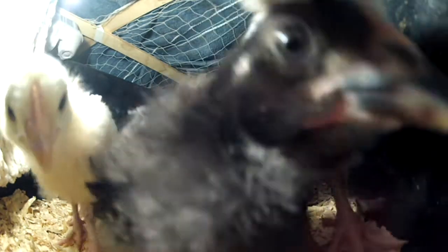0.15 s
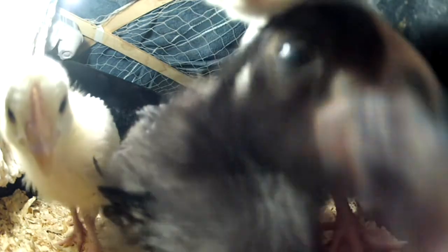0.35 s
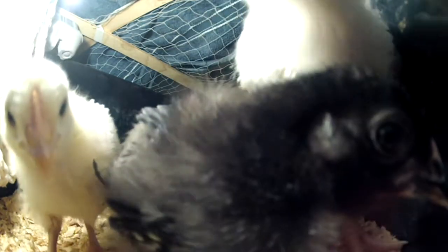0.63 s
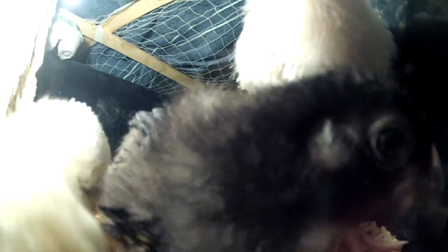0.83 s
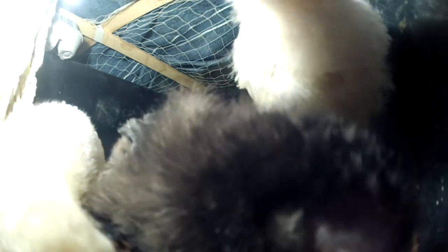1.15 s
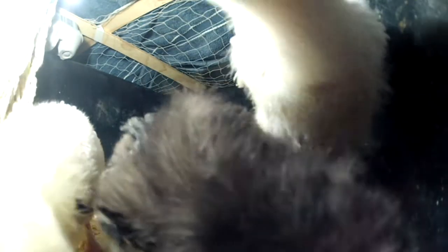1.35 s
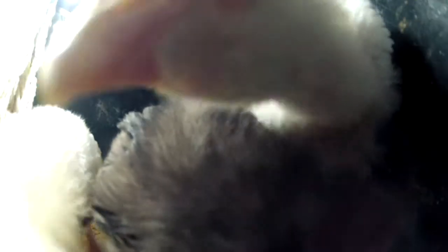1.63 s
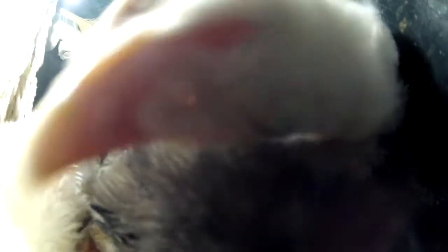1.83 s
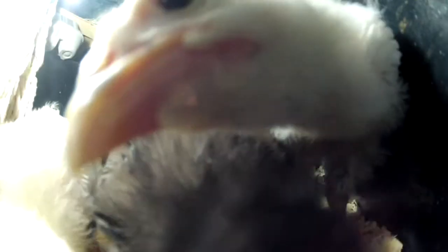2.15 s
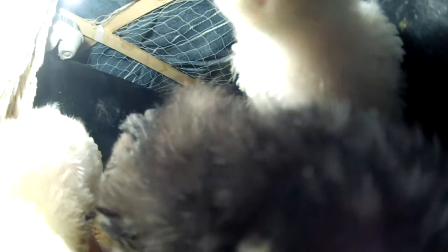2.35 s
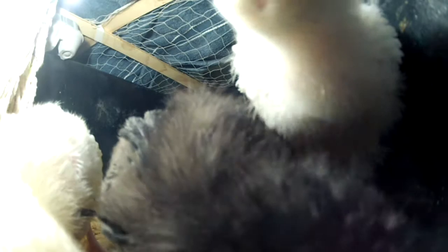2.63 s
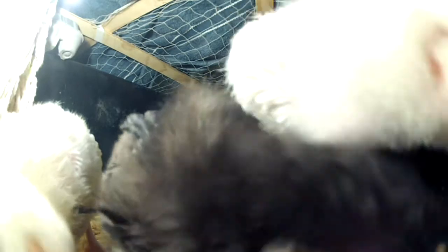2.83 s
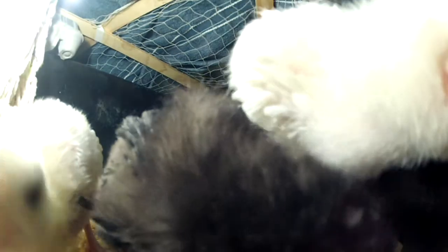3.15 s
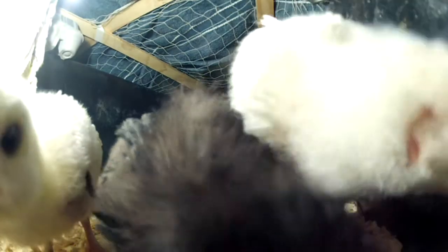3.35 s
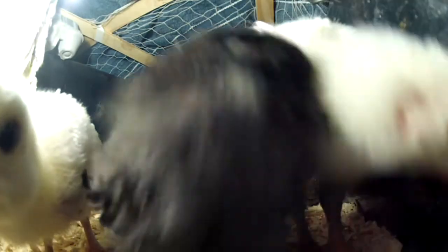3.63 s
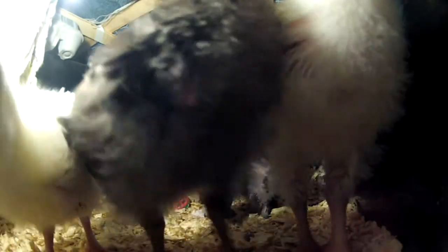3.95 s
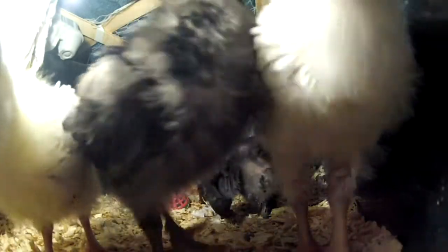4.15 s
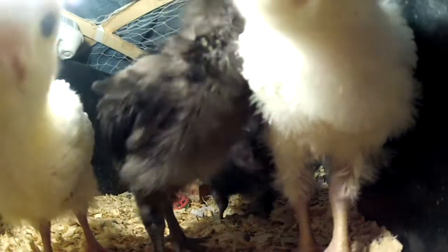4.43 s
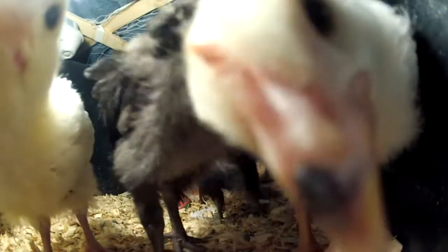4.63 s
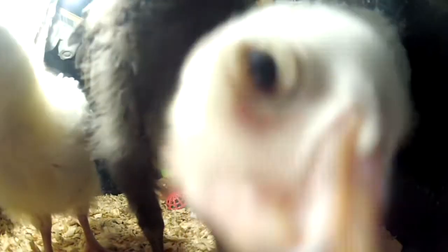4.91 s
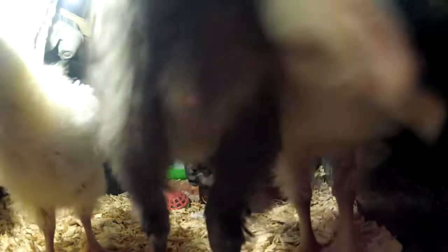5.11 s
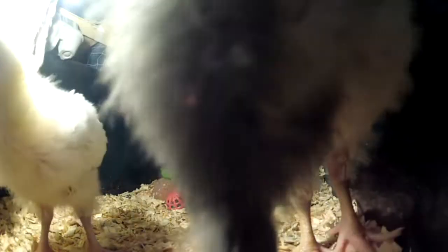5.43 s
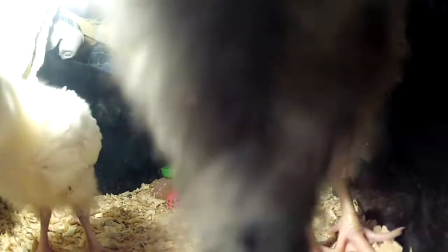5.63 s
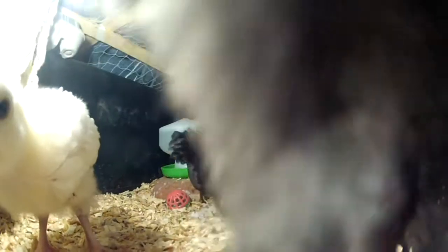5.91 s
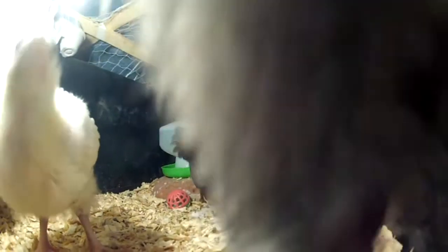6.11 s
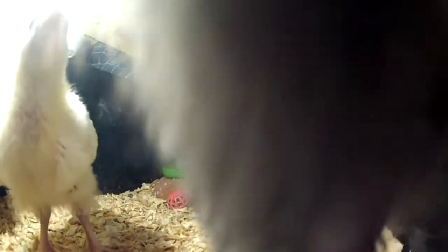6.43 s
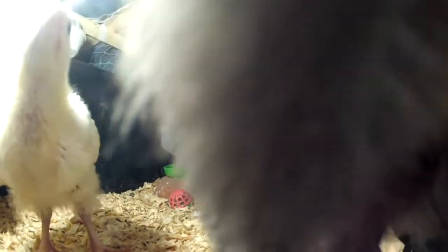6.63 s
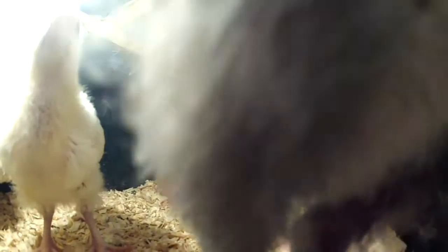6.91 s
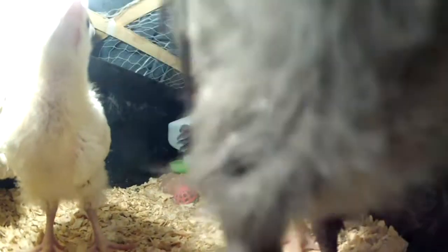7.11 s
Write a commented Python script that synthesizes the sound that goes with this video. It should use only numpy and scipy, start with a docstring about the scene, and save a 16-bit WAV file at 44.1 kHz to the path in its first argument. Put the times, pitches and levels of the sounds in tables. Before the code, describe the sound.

A microphone inside a small plastic housing sits among chicks on wood shavings. A rising peep is already sounding at 0 s, then short falling, slightly hoarse peeps follow until 0.5, over low, lumpy trampling. A sharp knock with a jolt lands at 0.57. More peeps come at 1.2, 1.3 and 1.6; hard pecks strike at 1.5, and a scraping cluster at 1.87-2.0 ends with a bump. Further knocks fall at 2.3, 2.9 and 3.5. From 3.6 to 5 it is mostly quiet hiss, soft rumble and small bumps, with faint peeps at 4.4 and from 4.8, growing clearer until 5.5. Strong pecks hit at 5.09, 5.37 and 5.53, with a long scrape at 5.85. From 5.9 to 7.25, down rubs in rough swells among knocks, notably near 6.13, 6.42, 6.76 and 7.13. Dry, close, gritty, clipping on peaks.

```python
"""Chicks around a plastic housing

Chicks crowd a small camera in its plastic housing on wood shavings. Peeps are gliding sines with a near echo;
rumble through the litter is shaped noise. Down, feet, beaks and claws rub the shell: tiny slips excite its modes.
Soft bumps rock the housing; sharp knocks make it ring briefly and jolt. A steady hiss lies underneath.
The recorder samples at 12 kHz and holds each value, so every sound is mirrored around 6 and 12 kHz."""
import sys
import numpy as np
from scipy import signal
from scipy.fft import rfft, irfft, next_fast_len
from scipy.io import wavfile
from scipy.ndimage import uniform_filter1d

SR = 44100
rng = np.random.default_rng(int(sys.argv[2]) if len(sys.argv) > 2 else 0)


def wav_record(signal):
    """Record a signal, one row per channel, as 16-bit PCM in the file named by sys.argv[1]."""
    frames = np.transpose(np.atleast_2d(signal))
    bounded = np.clip(frames, -1, 1)
    # unit amplitude maps onto the largest positive 16-bit level
    quanta = np.round(bounded * 32767).astype(np.int16)
    wavfile.write(sys.argv[1], SR, quanta)


N = 320607  # length in samples


def from_db(db):
    """Turn dB into gain."""
    return 10 ** (np.asarray(db) / 20)


def rms_one(x):
    """Scale to rms 1."""
    return x / np.sqrt(np.mean(x ** 2) + 1e-20)


def peak_at(rows, db):
    """Scale each row to its peak level."""
    return rows / np.abs(rows).max(axis=1, keepdims=True) * from_db(db)[:, None]


def drift(rate_hz):
    """Slow random wander of rms 1: noise through a double one-pole low-pass."""
    pole = np.exp(-2 * np.pi * rate_hz / SR)
    noise = rng.standard_normal(N + SR)
    slow = signal.lfilter([1], [1, -2 * pole, pole * pole], noise)
    return rms_one(slow[SR:])  # the first second lets the filter settle


def coloured(spectrum):
    """Noise of rms 1 whose spectrum is drawn in dB over log frequency."""
    size = next_fast_len(N)
    hz, db = np.transpose(spectrum)
    grid_hz = np.arange(1, size // 2 + 2) * SR / size
    gain = from_db(np.interp(np.log(grid_hz), np.log(hz), db))
    return rms_one(irfft(rfft(rng.standard_normal(size)) * gain, size)[:N])


def laid_out(seconds, rows):
    """Add each row into the timeline at its time."""
    out = np.zeros(N + rows.shape[1])
    starts = np.round(seconds * SR).astype(int)
    for start, row in zip(starts, rows):
        out[start:start + len(row)] += row
    return out[:N]


# housing modes, from rocking on the litter up to the high shell modes:
# (frequency [Hz], strength [dB], decay t60 [s])
HOUSING = [(60, -4.5, .05), (132, 2.5, 0.015), (310, -7.5, 0.014), (394, -5.5, 0.021), (695, -1.5, 0.016),
           (1058, -1, 0.013), (1371, 0, 0.0081), (1828.5, 0, 0.016), (2272, -1.5, 0.011),
           (2693, -7.5, .012), (3115, -2, 0.011), (3674, 1, 0.015), (4350, -8.5, 0.0055),
           (4900, -5.5, 0.0095), (5660, -0.5, .005)]
JOLT_MODES = HOUSING[:3]
SHELL = HOUSING[3:7], HOUSING[7:8], HOUSING[8:10], HOUSING[10:]  # low, ring, upper and high families
SHELL_SIGNS = 1, 1, -1, -1  # keep neighbouring modes in opposition across the families


def ring(forces, modes, spread_db):
    """Each row of force drives every mode as a decaying sine, with mode strengths of its own."""
    out = 0
    chance = rng.standard_normal((len(forces), len(modes)))
    for k, (hz, db, t60) in enumerate(modes):
        decay = from_db(-60 / (t60 * SR))
        w = 2 * np.pi * hz / SR
        sign = (-1) ** (k + 1)  # neighbouring modes swing in opposition
        gain = sign * from_db(db + spread_db * chance[:, k:k + 1])
        resonator = [1, -2 * decay * np.cos(w), decay * decay]
        out = out + gain * signal.lfilter([0, np.sin(w)], resonator, forces + 1e-18)
    return out


# gliding calls of the chicks: (time [s], length [ms], first pitch [Hz], last pitch [Hz], bend of the glide [exponent],
# crest level [dB], opening level re crest [dB], hoarseness [0 = clear])
PEEPS = [(0, 39.5, 2350, 3600, 4, -39.5, -14, 0), (.181, 50.4, 2740, 2220, 1.4, -44.5, -3.5, 0.19),
         (0.311, 48, 3110, 2195, 1.48, -40.5, -11, 0.6), (.492, 46.7, 3100, 2280, 1.23, -40, -17, 1),
         (1.207, 46, 2940, 2195, 1.2, -37.5, -16.5, 0.51),
         (1.332, 51.4, 2970, 2220, 1.03, -38, -18.5, 0.95),
         (1.629, 62.4, 3120, 2330, 1.06, -36.5, -10.5, 0.78), (4.436, 42, 3750, 2473, 1.35, -56.5, -10, .1),
         (4.78, 48.5, 2880, 2230, 1.64, -55, 3.5, 0.2), (4.895, 48, 2950, 2240, 1.9, -51, 0, 0.029),
         (5.044, 52.5, 2900, 2230, 1.1, -47, -3, 0.21), (5.265, 55, 3365, 2760, 0.88, -48.5, -3, 0.4),
         (5.385, 36, 2970, 2640, 1.12, -43, -8, 0), (5.503, 43.2, 3300, 2700, 2.2, -40, -3, 0.17)]
OCTAVE_DB = -23.5  # second harmonic re fundamental
RASP_HZ, RASP_S = 465, 0.014  # top of the flutter band; how long the flutter lasts
PEEP_ATTACK_S, PEEP_RELEASE_S, PEEP_EDGE_DB = 0.0078, 0.011, -21
PEEP_CREST_S, PEEP_SAG_DB = .022, -4  # the crest comes this long before the end, then the level sags
WALL_ECHO_S, WALL_ECHO_DB = .0028, -3.5  # a near wall's echo notches the glide every few hundred Hz


def peeps():
    """Whistles with a weak octave glide along a bent pitch curve; hoarse ones open with a flutter in level."""
    flutter_band = signal.butter(4, RASP_HZ, fs=SR, output="sos")
    hoarse = rms_one(signal.sosfilt(flutter_band, rng.standard_normal(N)))
    out = np.zeros(N)
    for s, length_ms, first_hz, last_hz, bend, db, opening_db, rasp in PEEPS:
        length = length_ms / 1e3
        at = np.arange(int(s * SR), int((s + length) * SR))
        t = np.maximum(at / SR - s, 0)

        # height runs from 0 at the low pitch to 1 at the high pitch
        height = t / length if last_hz > first_hz else np.maximum(1 - t / length, 0)
        pitch_hz = min(first_hz, last_hz) + abs(first_hz - last_hz) * height ** bend
        phase = 2 * np.pi * np.cumsum(pitch_hz) / SR
        tone = np.sin(phase)
        octave = from_db(OCTAVE_DB) * np.sin(2 * phase)

        start_db = opening_db + PEEP_EDGE_DB * (s > 0)  # a peep at time 0 is already sounding
        turns = [0, PEEP_ATTACK_S, length - PEEP_CREST_S, length - PEEP_RELEASE_S, length]
        shape_db = np.interp(t, turns, [start_db, opening_db, 0, PEEP_SAG_DB, PEEP_EDGE_DB])
        flutter = 1 + rasp * np.exp(-(t / RASP_S) ** 4) * hoarse[at]
        out[at] += np.sqrt(2) * from_db(db + shape_db) * (flutter * tone + octave)
    samples = np.arange(N)
    echo = np.interp(samples - WALL_ECHO_S * SR, samples, out)
    return out + from_db(WALL_ECHO_DB) * echo


# trampling in the litter, level before the lumps: (time [s], level [dB])
TRAMPLING = [(0.0, -56), (0.12, -51), (0.28, -45), (0.47, -46.5), (0.89, -54), (1.07, -56), (2.27, -52.5),
             (2.59, -60), (3.36, -58), (3.62, -52.5), (4.96, -53.5), (5.28, -49), (5.43, -48),
             (5.55, -44.5), (5.93, -42), (6.5, -52), (6.66, -45), (6.82, -78), (7.07, -45), (7.27, -38)]
# colour of the bass carried by the litter: (frequency [Hz], level [dB per Hz])
RUMBLE = [(12, -27.5), (20, -1.5), (65, 0), (123, 0.5), (166, -6.5), (248, -21.5), (357, -22.5),
          (500, -30.5), (650, -70.5), (1100, -120)]
SETTLE_DB, SETTLE_S = -27.5, .04  # settling rumble re jolt; its time constant


def rumble(t):
    """Lumpy bass of feet and bodies through the litter, swelling as the housing settles after each jolt."""
    knock_s, jolt_db = np.transpose(KNOCKS)[[0, 2]]
    settling = from_db(jolt_db + SETTLE_DB)[:, None] * np.exp(-t[:SR // 3] / SETTLE_S)
    trampling = from_db(np.interp(t, *np.transpose(TRAMPLING)))
    lumps = from_db(3.2 * drift(13))
    return (trampling + laid_out(knock_s, settling)) * lumps * coloured(RUMBLE)


# steady noise floor: (frequency [Hz], level [dB per Hz])
HISS = [(120, -29), (200, -3.5), (1030, -21), (1550, -21), (1820, -21), (2900, -25.5), (3700, -26),
        (4990, -24.5), (6000, -31.5), (7800, -66.5), (13200, -120)]
HISS_DB = -65  # rms


def hiss():
    """A steady bed of shaped noise."""
    return from_db(HISS_DB) * coloured(HISS)


# strokes of claw or beak along the shell:
# (time [s], length [ms], level [dB], high modes re that level [dB])
STROKES = [(0.066, 110, -62.5, -11), (.165, 52.2, -61, -16), (0.229, 108, -61, -8), (.563, 38.5, -45, -12),
           (1.481, 27, -45, -27), (1.544, 39.5, -45.5, -3), (1.721, 120, -73, -10), (1.872, 54, -33, -4.5),
           (1.959, 23.8, -23.5, -11.5), (1.984, 18.5, -45, -16.5), (2.299, 12, -37, -23.5),
           (2.316, 24, -49.5, -13), (2.34, 19, -37, -19), (2.359, 27.7, -48, -9.5),
           (2.889, 32.5, -35.5, -19.5), (3.486, 21, -54.5, -8.5), (3.505, 38, -42, -12),
           (3.95, 57.4, -66.5, -9), (4.5, 87, -69, -12), (4.64, 110, -67.5, -15), (5.085, 19.5, -47.5, -10),
           (5.322, 46, -45.5, -17), (5.359, 40, -43.5, -2), (5.536, 16.7, -23.5, -7),
           (5.555, 16, -45, -17.5), (5.597, 24, -57, -18), (5.634, 27, -41, -7), (5.847, 58.7, -20, -8.5),
           (6.324, 16, -34, -23)]
# down pressed against the shell by a chick standing over it: (time [s], level [dB])
LEANING = [(5.13, -77), (5.14, -56), (5.25, -48.5), (5.3, -63), (5.34, -52), (5.53, -59.5), (5.57, -75),
           (5.63, -55), (5.64, -51), (5.74, -49), (5.76, -41.5), (5.91, -35), (5.93, -43.5), (5.96, -34),
           (6.0, -50), (6.02, -64), (6.03, -42), (6.13, -30), (6.15, -40), (6.31, -38.5), (6.35, -50.5),
           (6.41, -46.5), (6.44, -57), (6.5, -63), (6.53, -40), (6.58, -41), (6.6, -48.5), (6.8, -43.5),
           (6.83, -54), (6.98, -54.5), (6.995, -46.5), (7.06, -45), (7.08, -31.5), (7.19, -35), (7.21, -49),
           (7.27, -40)]
RUSTLE_DB = -77  # distant stirring in the shavings
RUB_SHARES_DB = -2.5, -4.5, -6  # low, ring and upper shell modes under a rub
LEANING_HIGH_DB = -10  # high shell modes under leaning and rustle
SHORT_STROKE_MS = 45
SHORT_FADE_DB, LONG_FADE_DB = -8.5, -1.5  # change along a stroke: short ones die away, long ones nearly hold


def rubbing(t):
    """Clumps of tiny slips ring the shell, loud during each stroke, faint between; the colour wanders."""
    sizes = from_db(4.5 * np.minimum(rng.exponential(1, N), 5)) * rng.choice([-1, 1], N)
    happens = rng.random(N) < 2600 / SR  # about 2600 slips a second
    clumps = from_db(3.8 * drift(40))
    slips = sizes * happens * clumps

    families = []
    for modes, sign in zip(SHELL, SHELL_SIGNS):
        ringing = sign * rms_one(ring(slips[None], modes, spread_db=0)[0])
        families.append(ringing * from_db(1.8 * drift(25)))

    leaning = from_db(np.interp(t, *np.transpose(LEANING))) * (t > LEANING[0][0])
    steady = from_db(RUSTLE_DB) + leaning
    gains = steady * from_db([*RUB_SHARES_DB, LEANING_HIGH_DB])[:, None]
    for s, length_ms, db, high_db in STROKES:
        at = np.arange(int(s * SR), int((s + length_ms / 1e3) * SR))
        change_db = LONG_FADE_DB if length_ms > SHORT_STROKE_MS else SHORT_FADE_DB
        fade_db = change_db * np.linspace(-.5, .5, len(at))
        shares_db = np.array([*RUB_SHARES_DB, high_db])[:, None]
        gains[:, at] += from_db(db + shares_db + fade_db)
    smooth_gains = uniform_filter1d(gains, size=120, axis=1)  # softens the stroke edges
    return np.sum(np.array(families) * smooth_gains, axis=0)


# soft bumps of feet and bodies, some of them the housing settling after a knock: (time [s], peak level [dB])
BUMPS = [(0.062, -34.5), (0.256, -35), (0.31, -30), (.519, -21), (0.593, -36.5), (2.001, -19),
         (2.92, -30.5), (3.538, -28), (3.968, -29), (4.019, -35.5), (4.344, -35), (4.944, -34),
         (5.378, -20.5), (6.028, -32), (6.609, -24), (7.083, -30)]
BUMP_MS = 22  # time constant


def bumps():
    """Decaying bursts of low-passed noise shove the housing and rock its lowest modes."""
    s, db = np.transpose(BUMPS)
    ms = np.arange(6000) / SR * 1e3
    shoves = rng.standard_normal((len(s), len(ms))) * np.exp(-ms / BUMP_MS)
    soft = signal.sosfilt(signal.butter(2, 140, fs=SR, output="sos"), shoves)
    return laid_out(s, peak_at(ring(soft, JOLT_MODES, spread_db=2.5), db))


# knocks on the shell: (time [s], ring peak [dB], jolt level [dB], brightness re ring [dB], contact [ms],
# shove length [ms], negative is inward)
KNOCKS = [(.069, -41.5, -49, -3, 2.1, -4), (0.1742, -42, -44, -16, 1.7, -3.5),
          (0.1878, -37, -65, -9, 1.8, -1.5), (0.2516, -35.5, -34, -5, 1.5, -1.5),
          (0.3022, -45, -59, 1, 3.5, -1.5), (0.4699, -56, -58.5, 3, 2, -1.5),
          (0.5676, -12.5, -3.5, 8.5, 1.66, 0.07), (.575, -15.5, -8, 5, 1.8, 0.5),
          (0.59, -28.5, -26, -3.5, 4.9, 2), (1.481, -12.5, -1, -2.5, 3.5, 0.6),
          (1.545, -8, -19.5, -0.5, 2, 0.5), (1.5545, -1, -13, -4.5, 1.4, -1.4),
          (1.779, -54.5, -54.5, 7, 1, -6), (1.8144, -46, -61, 1, 2, 1), (1.853, -50, -62.5, -2, 2.4, -1.5),
          (1.873, -9.5, -16.5, 0, 0.47, 3.7), (1.8859, -9.5, -21.5, 5, 1, -6.5),
          (1.9018, -27, -33, 4, 1.3, 1.5), (1.9121, -19.5, -32, -1.5, 3.5, 1),
          (1.961, -8, -27, 1, 2.5, -1.5), (1.9646, -2, -6.5, -2.5, 1.37, -0.55),
          (1.989, -20.5, -16, -4.5, 1.25, -1.5), (2.1415, -52.5, -78, 0, 1, -1.5),
          (2.2985, -19, -7.5, -0.5, 1.33, 1.5), (2.307, -38, -26, 6.5, 3.6, -1.5),
          (2.3385, -12, -8, -2.5, 2.4, 4), (2.3582, -49.5, -33.5, 5, 2.2, -1.5),
          (2.379, -41.5, -31, 4.5, 1.7, 5), (2.7538, -52.5, -72.5, -4, 1, -1.5),
          (2.8833, -0.5, -3.5, -1, 3.24, 1.5), (2.908, -20, -19, -6.5, 0.55, 2),
          (2.9154, -26.5, -38, -5, 0.94, -1.5), (3.2178, -56.5, -64, 6, 1, -1.5),
          (3.4791, -37.5, -30.5, 0.5, 1.46, -5), (3.5058, 0, -10, -4, 3.9, 3.6),
          (3.5221, -26.5, -25, 2, 0.88, -6.5), (3.559, -44.5, -39, -6, 6.4, 3),
          (3.976, -58, -52, 2.5, 5, -1.5), (4.2932, -57.5, -66, -1.5, 2, -1.5),
          (4.4246, -46, -32, -11, 0.56, -0.55), (4.66, -38, -44, -4, 5.1, -0.5),
          (5.0876, -6, -3.5, 5, 2.87, 2.6), (5.1348, -26.5, -40, -4.5, .6, 0.5),
          (5.1447, -28.5, -41, 0, 2.8, 5), (5.1521, -34, -51, -4, 1.9, -1),
          (5.177, -41.5, -39, -8.5, 4.6, -4), (5.203, -33.5, -46, -5.5, 1.9, -5.5),
          (5.3371, -40.5, -50, 5, 3.5, -1.5), (5.3439, -36, -45, 4, 2.9, 0.5),
          (5.3718, -5, -10, 3, 3.4, -0.2), (5.499, -39, -40, 1, 2.26, 3), (5.534, -2.5, -18, -5, 0.89, -4),
          (5.5405, -27, -29.5, -7.5, 1.5, -1.5), (5.598, -15, -13, -12, 5.95, -0.3),
          (5.6444, -35.5, -42, 5, 3.1, -1.5), (5.707, -42, -59, 4, 1.8, -1.5),
          (5.732, -31.5, -32, 1, 4, -15), (5.7579, -33, -15, 3, 0.47, -3), (5.8489, -9, -30, -15, 3, -3),
          (5.8641, -20, -16, -13, 1.8, 0.8), (5.9016, -31, -45, 7, 2.4, -1.5),
          (5.9564, -25.5, -35, -6, 1.8, -1.5), (5.962, -33.5, -13.5, 5, 3.8, -0.7),
          (5.9691, -25, -18, 5.5, 3.1, -1), (6.0344, -34.5, -27.5, 7, 7.1, -1.8),
          (6.0967, -34, -43, -2, 4.2, 1), (6.1278, -29.5, 2, 17, 1.57, -1.5),
          (6.17, -12.5, -31.5, -4, 3.9, -5), (6.2121, -28, -43, -2, 3, 5),
          (6.2898, -34, -48, -14, 6.1, -3.1), (6.3136, -31, -57, -7, 2.1, -2),
          (6.3282, -16, -5.5, 1.5, 1.2, -3), (6.4209, -1, -17.5, -5, 1.46, -1),
          (6.4482, -22, -37, -20, 1.6, -12), (6.4706, -13.5, -32, -26, 3.2, -0.5),
          (6.5684, -23.5, -7, 4, 0.45, -2), (6.5927, -45, -42, 10, 1.5, -1.5),
          (6.615, -39, -32, 3.5, 0.64, 6), (6.675, -36, -35, 6.5, .5, -2.5),
          (6.692, -37, -44, -12, 6.8, 2.5), (6.7565, 0.5, -23.5, -10, 2.1, -0.04),
          (6.8066, -16.5, -8, -1.5, 0.43, -0.5), (6.9983, -35.5, -42, 6.5, 2, 1.1),
          (7.0161, -34.5, -47, 9, 2.5, -5), (7.04, -42, -57, -2, 2, -1.5),
          (7.107, -30.5, -34, -0.5, 6.2, 0.5), (7.125, -2, -34, -15, 2.1, -1),
          (7.1718, -5.5, -28, -11, 1.8, -.6), (7.1905, -18, -33.5, 1, 3.6, -0.5),
          (7.2296, -31, -26, 8.5, 2.5, -1.5)]
LOW_DB, LOW_FOLLOWS_JOLT = 3, .55  # low shell modes re ring; they rise with the jolt's lead over the ring
UPPER_DB, HIGH_DB = 0.16, -3.5  # upper and high shell modes re brightness


def knocks():
    """A tick, then the beak chatters on the shell for the contact time while its shove rocks the housing."""
    s, ring_db, jolt_db, bright_db, contact_ms, shove_ms = np.transpose(KNOCKS)
    ms = np.arange(4000) / SR * 1e3
    touching = 1 / (1 + (ms / contact_ms[:, None]) ** 6)
    force = 0.36 * touching * rng.standard_normal((len(s), len(ms)))
    force[:, 0] = -3.2 * np.sign(shove_ms)  # the tick

    low_db = ring_db + LOW_DB + LOW_FOLLOWS_JOLT * (jolt_db - ring_db)
    upper_db = ring_db + bright_db + UPPER_DB
    high_db = ring_db + bright_db + HIGH_DB
    ringing = 0
    for modes, db, sign in zip(SHELL, (low_db, ring_db, upper_db, high_db), SHELL_SIGNS):
        ringing = ringing + sign * peak_at(ring(force, modes, spread_db=2.0), db)

    shove = np.sin(np.pi * np.clip(ms / shove_ms[:, None], -1, 1))  # half a sine
    kick = np.gradient(shove, axis=1)
    rocking = peak_at(ring(kick, JOLT_MODES, spread_db=2.1), 0 * s)
    jolt = peak_at(rocking + 0.27 * shove, jolt_db)
    return laid_out(s, ringing + jolt)


SIDE_DB = -45  # random level difference between the channels


def scene():
    """One microphone inside the shell; the two channels differ only by a trace."""
    t = np.arange(N) / SR
    mono = peeps() + rumble(t) + hiss() + rubbing(t) + bumps() + knocks()
    side = from_db(SIDE_DB) * drift(300)
    return mono * (1 + side * np.array([[1], [-1]]))


SAMPLE_HZ, CUTOFF_HZ = 12000, 16182  # the recorder's own sample rate; where the top is cut


def record(dry):
    """Band-limit, sample, overload, hold each value four steps so the spectrum mirrors, and cut the top."""
    smooth = signal.sosfilt(signal.butter(4, 5500, fs=SR, output="sos"), dry)
    sampled = signal.resample_poly(smooth, SAMPLE_HZ, SR, axis=1)
    overloaded = np.clip(sampled, -.93, .93)
    steps = np.repeat(overloaded, 4, axis=1)
    held = signal.resample_poly(steps, SR, 4 * SAMPLE_HZ, axis=1)[:, :N]
    top_cut = signal.cheby2(12, 70, CUTOFF_HZ, fs=SR, output="sos")
    return np.clip(signal.sosfilt(top_cut, held), -1, 1)


dry = scene()
out = record(dry)
wav_record(out)
```